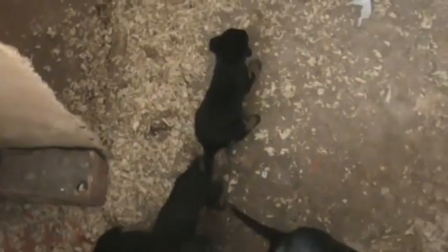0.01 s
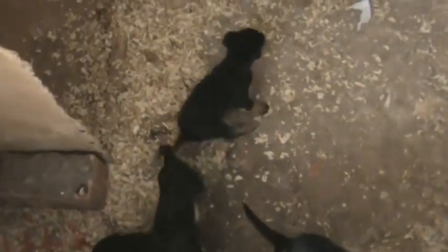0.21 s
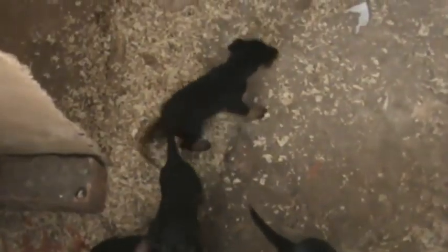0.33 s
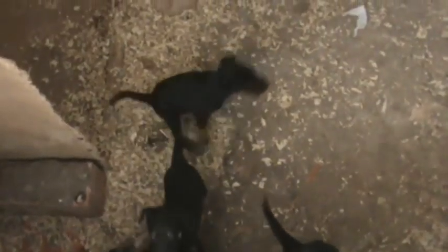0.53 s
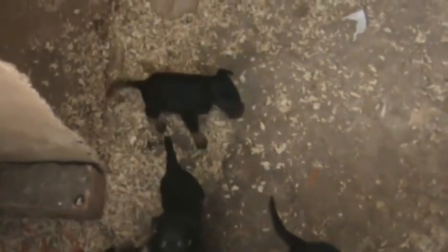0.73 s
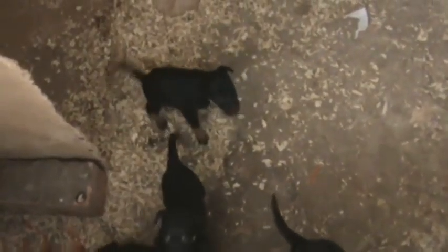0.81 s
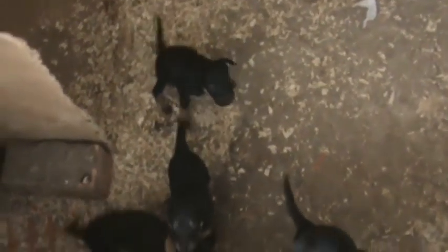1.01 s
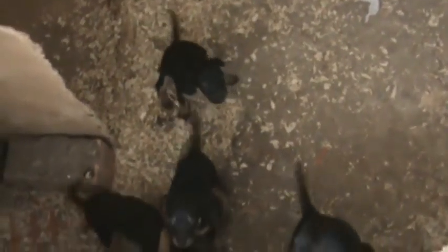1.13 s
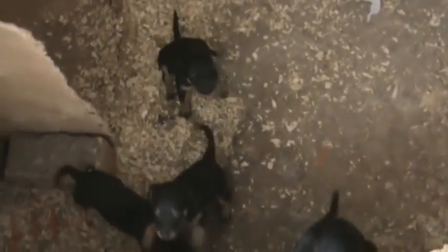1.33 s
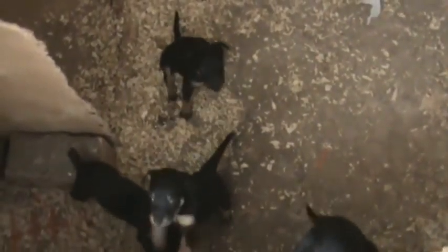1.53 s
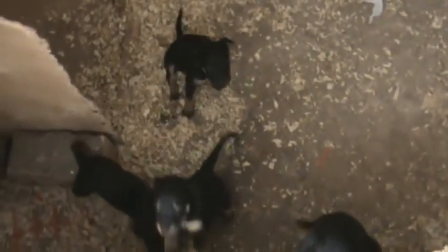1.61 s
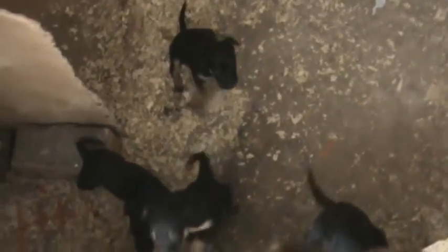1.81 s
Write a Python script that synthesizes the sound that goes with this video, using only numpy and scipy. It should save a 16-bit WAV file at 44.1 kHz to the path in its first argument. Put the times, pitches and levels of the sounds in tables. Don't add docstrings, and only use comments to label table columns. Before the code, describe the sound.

Puppy gives a sharp rising yelp, then a long high whine and a soft whimper, indoors

```python
import sys
import numpy as np
from scipy import signal
from scipy.fft import rfft, irfft, next_fast_len
from scipy.io import wavfile
from scipy.ndimage import uniform_filter1d, minimum_filter1d, map_coordinates

SR = 44100
rng = np.random.default_rng(int(sys.argv[2]) if len(sys.argv) > 2 else 0)


def elevation(decibels):
    levels = np.asarray(decibels, float)
    return 10 ** (levels / 20)


def wav_out(sig):
    wavfile.write(sys.argv[1], SR, np.round(np.clip(np.atleast_2d(sig).T, -1, 1) * 32767).astype(np.int16))


N = 81585


def unit(x):
    return x / np.sqrt(np.mean(x ** 2) + 1e-20)


def along(points, hz):
    f, v = np.transpose(points)
    return np.interp(np.log(hz + 1), np.log(f + 1), v)


def wobble(rate):
    knots = rng.standard_normal(int(N * rate / SR) + 4)
    return map_coordinates(knots, [np.arange(N) * rate / SR])


def filtered(x, response):
    m = next_fast_len(N + SR // 2)
    return irfft(rfft(x, m) * response(np.fft.rfftfreq(m, 1 / SR)), m)[..., :N]


def noise(spectrum, channels=1):
    white = rng.standard_normal((channels, N))
    return unit(filtered(white, lambda hz: elevation(along(spectrum, hz))))


def causal(spectrum, size=2048):
    c = irfft(np.log(elevation(along(spectrum, np.fft.rfftfreq(size, 1 / SR))) + 1e-6), size)
    c[1:size // 2] *= 2
    c[size // 2 + 1:] = 0
    return irfft(np.exp(rfft(c)), size)


# (frequency [Hz], level [dB])
BREATH = [(300, -25.5), (900, -28), (2000, 1), (3000, -9.5), (5000, 1.5), (8000, -4), (10800, -16.5),
          (12000, -47), (16000, -68)]
SHIMMER_DB, PATCHY_DB = 0.7, 3.5
GRAIN_GROWS, BLUR_RADIANS = 0.45, 0.12


def voice(contour, mouth, breath_db, jitter):
    s, hz, db, over_db = np.transpose(contour)
    t = np.arange(N) / SR
    pitch = np.interp(t, s, hz) * (1 + jitter * (wobble(60.08) + wobble(200)))
    phase = 2 * np.pi * np.cumsum(pitch) / SR
    over = np.interp(t, s, over_db)
    mouth_s = [shape[0] for shape in mouth]
    shares = [np.interp(t, mouth_s, pick) for pick in np.eye(len(mouth))]

    tone = np.sin(phase)
    for k in range(2, 10):
        passed_db = sum(share * along(shape[1], k * pitch) for share, shape in zip(shares, mouth))
        slow, grain = wobble(13.98), wobble(89.67)
        patch_db = PATCHY_DB * (0.5 * slow + GRAIN_GROWS * np.sqrt(k) * grain)
        audible = k * pitch < SR / 2.2
        blur = BLUR_RADIANS * k * grain[::-1]
        tone = tone + elevation(over + passed_db + patch_db) * audible * np.sin(k * phase + k + blur)

    breath = elevation(breath_db + 0.81 * over) * noise(BREATH)[0] * (1 + np.cos(phase))
    level_db = np.interp(t, s, db, -200, -200) + SHIMMER_DB * wobble(39.26)
    return np.sqrt(2) * elevation(level_db) * (tone + breath)


# (time [s], pitch [Hz], level [dB], overtones [dB])
YELP = [(.196, 1810, -33, -37), (.203, 1416, -31, -5), (.214, 1514, -27, -4.5), (.222, 1675, -14.5, -9.5),
        (.236, 1699, -17, -7.5), (.25, 1950, -17, 0.5), (.266, 2003, -32, 4.5), (.279, 2096, -12.5, -1),
        (.289, 2242, -15.5, -3.5)]
YELP_TOP = [(0.309, 2239, -22, -13), (0.322, 2233, -15, -10.5), (0.342, 2236, -14, -15),
            (0.349, 2225, -24, -17), (.352, 1672, -30, -33), (.358, 1458, -31, -36.5),
            (0.368, 1480, -60, -33)]
# (frequency [Hz], level [dB])
THROAT_RISE = [(2800, -9), (3300, -4.5), (4400, 0), (5000, -4), (5800, -1), (6800, -4.5), (8300, -14.5),
               (10500, -29.5), (13000, -60)]
THROAT_YELP = [(2800, -3.5), (4200, -3), (5000, -6.5), (6100, -0.5), (6900, -19), (8300, -18.5),
               (10500, -35), (13000, -57)]
THROAT_TOP = [(2800, -8), (4400, 3), (6700, -23), (8900, -27.5), (11000, -32), (13000, -55)]
# (time [s], throat colour)
MOUTH_YELP = [
    (0.239, THROAT_RISE),
    (0.254, THROAT_YELP),
    (0.277, THROAT_YELP),
    (.29, THROAT_TOP),
]


def yelp():
    return voice(YELP + YELP_TOP, MOUTH_YELP, breath_db=-24.5, jitter=0.00567)


# (time [s], pitch [Hz], level [dB], overtones [dB])
WHINE_LOW = [(.573, 2152, -57, -16.5), (.579, 1960, -31, 2), (.586, 1678, -26, -6), (.595, 1657, -20.5, 1),
             (.603, 1680, -11.5, -1), (.62, 1741, -26, 16), (.634, 1775, -13.5, 5.5)]
WHINE_HIGH = [(0.636, 2080, -23.5, 14.5), (0.667, 2234, -16.5, 6), (.695, 2094, -15, -10),
              (0.737, 2070, -10.5, -14), (0.786, 2113, -19.5, -7.5), (.845, 2079, -19.5, -9.5),
              (.872, 1993, -16, -7), (0.911, 1904, -20.5, -15.5), (0.976, 1871, -21.5, -20.5)]
WHINE_SIGH = [(0.997, 1837, -32.5, -11), (1.027, 1827, -30.5, -7.5), (1.103, 1800, -38.5, -2),
              (1.14, 1713, -42, 2.5), (1.21, 1711, -36, -4), (1.262, 1603, -35.5, -4),
              (1.318, 1585, -41, 2.5), (1.327, 1336, -35, -47), (1.35, 1420, -84, -33)]
# (frequency [Hz], level [dB])
THROAT_LOW = [(3400, -3.5), (5100, -15), (6800, -5), (8500, -35), (10500, -38), (11500, -48), (14000, -84)]
THROAT_WHINE = [(3300, -1), (4300, -1.5), (5100, -10), (6200, -16), (6900, -12.5), (8500, -34),
                (10500, -56), (13000, -83)]
THROAT_SIGH = [(3400, -10.5), (5200, -17.5), (6700, -6.5), (8500, -24), (10000, -32), (11200, -22.5),
               (12100, -22.5), (12800, -57)]
# (time [s], throat colour)
MOUTH_WHINE = [
    (0.633, THROAT_LOW),
    (0.635, THROAT_WHINE),
    (0.849, THROAT_WHINE),
    (1.016, THROAT_SIGH),
]


def whine():
    return voice(WHINE_LOW + WHINE_HIGH + WHINE_SIGH, MOUTH_WHINE, breath_db=-29.5, jitter=0.0012)


# (time [s], pitch [Hz], level [dB], overtones [dB])
WHIMPER = [(1.509, 1153, -49.5, -22), (1.53, 1312, -35, -4), (1.545, 1447, -33, 1), (1.56, 1552, -31, 5),
           (1.59, 1731, -33, 3.5), (1.62, 1578, -45, 3.5), (1.665, 1439, -46.5, 4.5),
           (1.72, 1452, -45.5, 3), (1.79, 1548, -46.5, 5), (1.832, 1530, -46.5, 6), (1.84, 1527, -35.5, 0),
           (1.85, 1540, -35.5, -4)]
# (frequency [Hz], level [dB])
THROAT_OPEN = [(2400, -4.5), (3300, -12), (4900, -14.5), (6500, -8.5), (7600, -20.5), (8500, -20.5),
               (10000, -42), (16000, -53)]
THROAT_WHIMPER = [(2400, -17.5), (3300, -20.5), (4600, -17), (6200, -8.5), (7600, -11), (9200, -29),
                  (12000, -61), (16000, -61)]
# (time [s], throat colour)
MOUTH_WHIMPER = [
    (1.6, THROAT_OPEN),
    (1.65, THROAT_WHIMPER),
]


def whimper():
    return voice(WHIMPER, MOUTH_WHIMPER, breath_db=-28.0, jitter=0.0029)


# (start [s], length [s], level [dB], starting flap rate [1/s], air share [ratio], dulled above [Hz])
SNORTS = [
    (.116, 0.026, -23.5, 520, 0.34, 16000),
    (0.407, .033, -30, 400, 0.18, 3540),
]
# (frequency [Hz], level [dB])
NOSE = [(150, -39.5), (250, -29), (890, -9.5), (2530, -10), (3170, -15.5), (3520, -13.5), (7440, -14),
        (11500, -23.5), (16000, -40)]
FLAPS_SPEED_UP, SNORT_FADE, SNORT_RISE_S = 1.3, 0.9, 0.00055


def snorts():
    out = np.zeros(N + SR)
    for s, length, db, rate, share, dull_hz in SNORTS:
        u = np.arange(round(length * SR)) / (length * SR)
        flap_rate = rate * FLAPS_SPEED_UP ** u * (1 + 0.16 * wobble(500)[:len(u)])
        cycles = np.cumsum(flap_rate) / SR
        flaps = -np.diff(np.floor(cycles), prepend=-1) * elevation(1.7 * rng.standard_normal(len(u)))
        air = share * (0.1 + u) * rng.standard_normal(len(u)) * elevation(1.1 * wobble(353)[:len(u)])
        dulled = signal.lfilter([1], [1, -np.exp(-2 * np.pi * dull_hz / SR)], flaps + air)
        fade = 1 - SNORT_FADE * u ** 1.22
        rise = np.minimum(1, (u + 1e-3) * length * rate / 520 / SNORT_RISE_S)
        out[round(s * SR):][:len(u)] += elevation(db) * unit(dulled) * fade * rise
    nose = causal(NOSE)
    return signal.fftconvolve(out, nose / np.linalg.norm(nose))[:N]


# (time [s],
# level [dB], pitch [Hz], t60 [s], rise [s])
TAPS = [(0.251, -22.5, 1058, 0.022, 0.0024), (0.419, -36, 542, 0.056, 0.0016),
        (0.5473, -26, 4060, 0.0068, 0.00046), (.634, -39.5, 780, .012, 0.0012),
        (0.677, -41.5, 510, 0.018, .001), (0.548, -32.5, 1030, 0.019, 0.0008),
        (0.411, -31, 1006, 0.064, 0.00079), (0.696, -36.5, 985, 0.068, 0.0018),
        (0.713, -37.5, 407, 0.046, 0.0032), (1.12, -43, 2490, 0.077, 0.0051),
        (1.25, -43.5, 4010, 0.08, 0.006), (1.328, -39.5, 6930, 0.066, 0.0048),
        (1.414, -45.5, 1090, 0.08, 0.00083), (1.43, -50, 2650, 0.041, 0.0034),
        (1.51, -42.5, 1197, 0.12, 0.00093), (1.843, -42.5, 1190, 0.018, 0.0018),
        (1.72, -44.5, 169, 0.35, 0.078)]
SCRATCH_DB = -3


def taps():
    out, t = np.zeros(N + SR), np.arange(SR // 2) / SR
    for s, db, hz, t60, rise in TAPS:
        wander = np.cumsum(rng.standard_normal(len(t))) * np.sqrt(1.4 * hz / SR)
        ring = np.sin(2 * np.pi * hz * t + wander)
        scratch = elevation(SCRATCH_DB) * np.sqrt(hz / 4000) * rng.standard_normal(len(t))
        envelope = elevation(db - 60 * t / t60) * (1 - np.exp(-t / rise))
        out[round(s * SR):][:len(t)] += envelope * (ring + scratch)
    return filtered(out[:N], lambda f: f / (f + 60) / (1 + (f / 11000) ** 2))


# (frequency [Hz], width [Hz], level [dB])
KNOCK = [(290, 42, -7.5), (580, 38, -4), (910, 7.2, 5), (1020, 36, -3.5), (1800, 59, -4)]
KNOCK_DB, KNOCK_T60_S, KNOCK_HISS_DB = -38, 0.2, -14.5


def knock_echo():
    def wood(f):
        total = 0
        for k, (centre, width, db) in enumerate(KNOCK):
            damping = 1j * f * width
            total = total + (-1) ** k * elevation(db) * damping / (centre * centre - f * f + damping)
        return total

    echo = unit(filtered(rng.standard_normal((2, N)), wood))
    echo = echo + elevation(KNOCK_HISS_DB) * noise(NOSE, channels=2)
    decay = elevation(KNOCK_DB - 60 * np.arange(N) / SR / KNOCK_T60_S)
    return decay * (echo + 0.78 * echo[::-1])


# (frequency [Hz], level [dB])
FLOOR = [(15, -36.5), (25, -4.5), (516, -2.5), (677, -11), (887, -9), (1440, -3), (1790, -8.5), (6000, -9),
         (16000, -19.5)]
# (time [s], level [dB])
FLOOR_GAIN = [(0, 2), (.2, 4.5), (.55, 5.5), (0.701, -2.5), (1.05, -3.5), (1.4, -2.5), (1.6, -1.5),
              (1.85, -1)]
FLOOR_DB, RUMBLE_DB, HUM_DB, HUM_HZ = -57, -66.5, -63, 50


def floor():
    t = np.arange(N) / SR
    hiss = noise(FLOOR, channels=2)
    hiss = elevation(FLOOR_DB + 0.66 * wobble(6.7)) * (hiss + 0.43 * hiss[::-1])
    rumble = noise([(20, -7.5), (50, 3.0), (70, -7.5), (200, -11.0), (500, -46.0)])
    rumble = elevation(RUMBLE_DB) * rumble * elevation(0.83 * wobble(4.9))
    hum = elevation(HUM_DB + 1.5 * wobble(3.8)) * np.sin(2 * np.pi * HUM_HZ * t)
    return elevation(np.interp(t, *np.transpose(FLOOR_GAIN))) * (hiss + rumble + hum)


# (frequency [Hz], t60 [s])
PEN = [(200, 0.25), (2000, 0.36), (5000, 0.32), (12000, 0.41)]
ROOM_SIDE_DB, ROOM_DELAY_S = -11.5, 0.004


def pen(x):
    hz, t, z = signal.stft(rng.standard_normal((2, SR)), SR, nperseg=256)
    decay = elevation(-60 * t / along(PEN, hz)[:, None])
    mid, side = signal.istft(z * decay, SR, nperseg=256)[1]
    side = elevation(ROOM_SIDE_DB) * side
    tail = np.array([mid + side, mid - side]) / np.linalg.norm(mid)
    late = np.pad(x, (round(ROOM_DELAY_S * SR), 0))
    return signal.fftconvolve(late[None], tail, axes=1)[:, :N]


# (delay [s], level [dB])
WALLS = [(.00333, -5), (.00762, -6), (.0119, -7), (.01714, -8), (.02333, -9)]
WALL_DULL_HZ, WET_DB = 5160, 0.5


def placed(x, pan_db, wet_db):
    dull = filtered(x, lambda f: 1 / (1 + 1j * f / WALL_DULL_HZ))
    walls = sum(elevation(db + wet_db) * np.pad(dull, (round(s * SR), 0))[:N] for s, db in WALLS)
    sides = elevation([[pan_db / 2], [-pan_db / 2]])
    return (x + walls) * sides + elevation(WET_DB + wet_db) * pen(dull)


def scene():
    return (placed(yelp(), pan_db=1.5, wet_db=-2.5)
            + placed(whine(), pan_db=1.14, wet_db=-3)
            + placed(whimper(), pan_db=1.5, wet_db=1.5)
            + placed(snorts(), pan_db=6.5, wet_db=-8)
            + placed(taps(), pan_db=9.0, wet_db=-3.5)
            + knock_echo()
            + floor())


def band_limit(x):
    return signal.sosfilt(signal.butter(12, 16470, fs=SR, output="sos"), x)


# (frequency [Hz], left lead [radians])
PORTS = [(25, .3), (60, 0.67), (150, 1.45), (400, 1.76), (900, 1.02), (2400, 0.39), (6000, 0.36),
         (11000, -0.59), (14000, -0.71)]
TOP_HZ, LIMIT, LIMIT_HOLD_S = 16400, 0.52, 0.012


def record(dry):
    def port_response(hz):
        return (hz < TOP_HZ) * np.exp(0.5j * along(PORTS, hz) * np.array([[1], [-1]]))

    ports = filtered(dry, port_response)
    hold = round(LIMIT_HOLD_S * SR)
    needed = LIMIT / np.maximum(np.abs(ports).max(axis=0), LIMIT)
    gain = uniform_filter1d(minimum_filter1d(needed, hold), hold)
    return band_limit(ports * gain)


dry = scene()
out = record(dry)
wav_out(out)
```